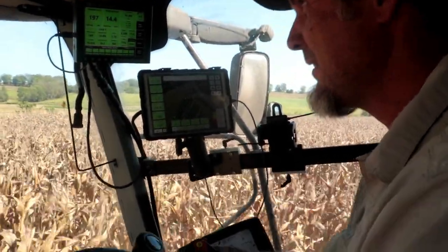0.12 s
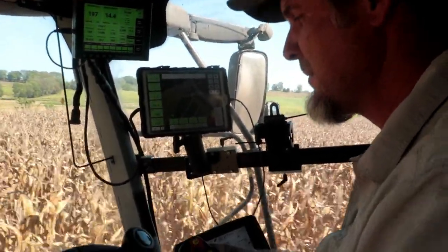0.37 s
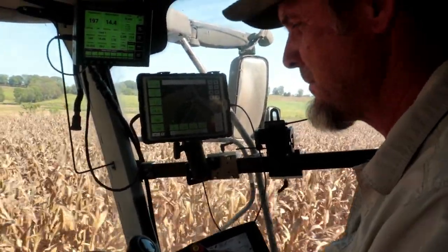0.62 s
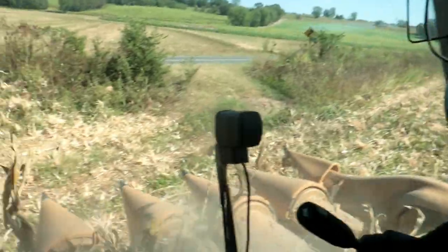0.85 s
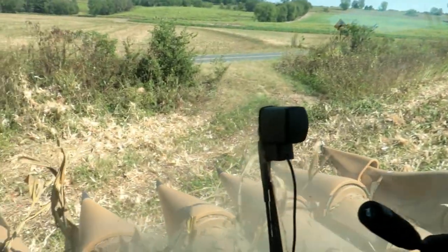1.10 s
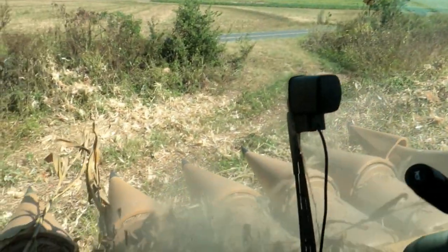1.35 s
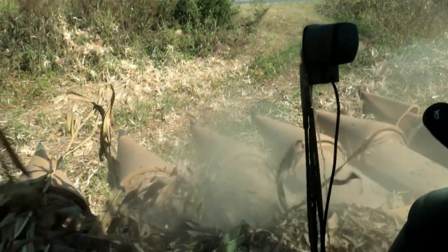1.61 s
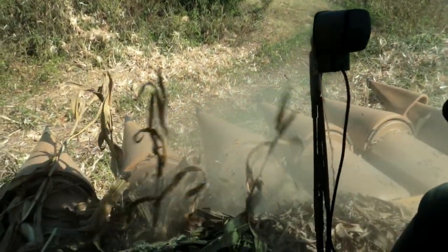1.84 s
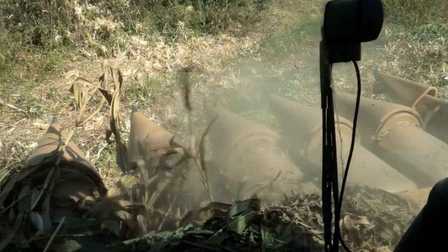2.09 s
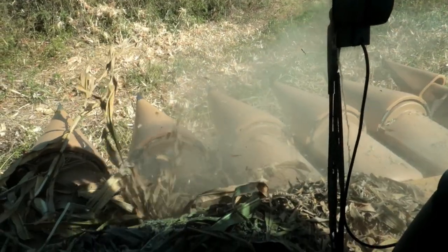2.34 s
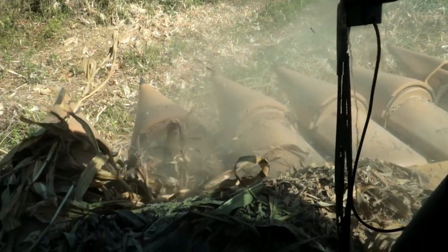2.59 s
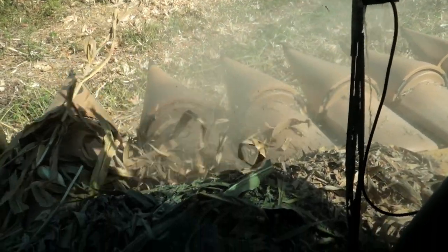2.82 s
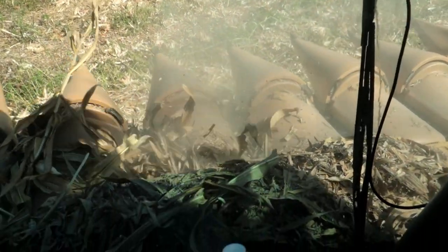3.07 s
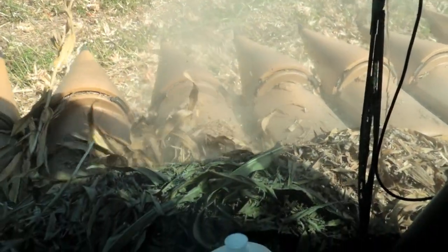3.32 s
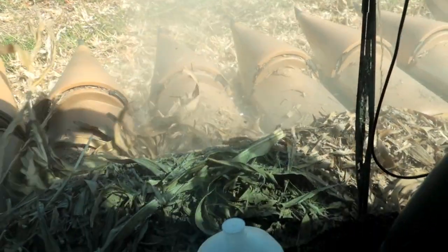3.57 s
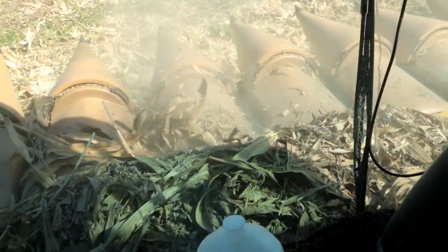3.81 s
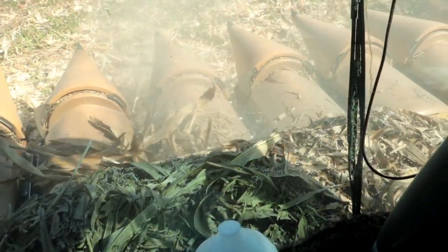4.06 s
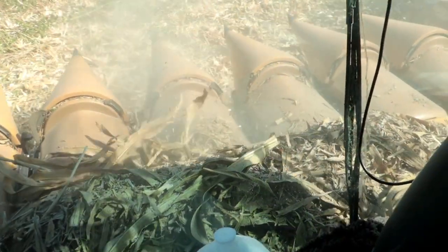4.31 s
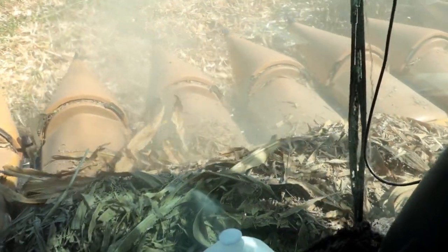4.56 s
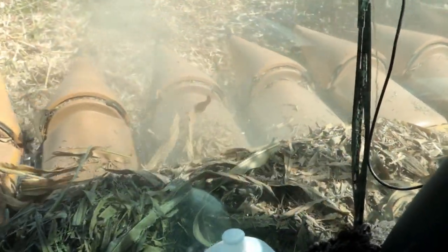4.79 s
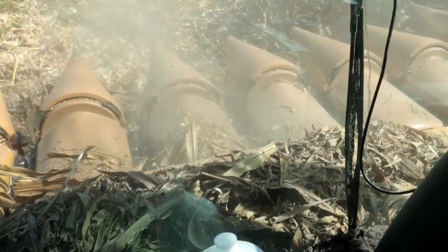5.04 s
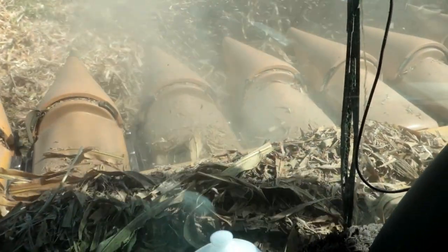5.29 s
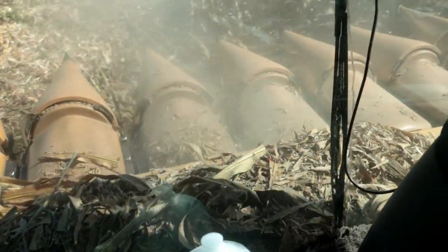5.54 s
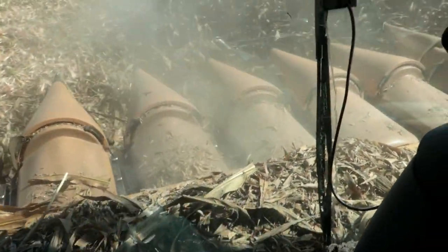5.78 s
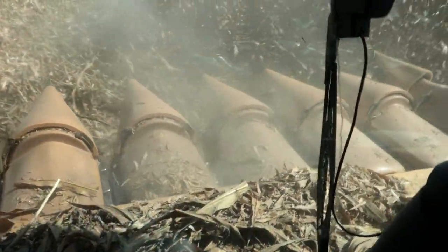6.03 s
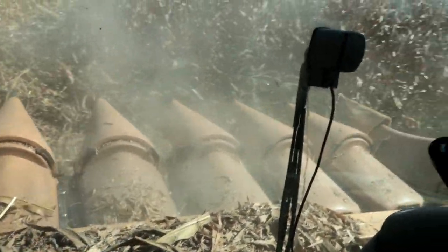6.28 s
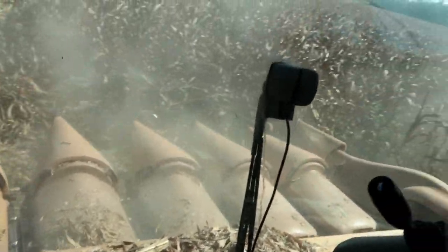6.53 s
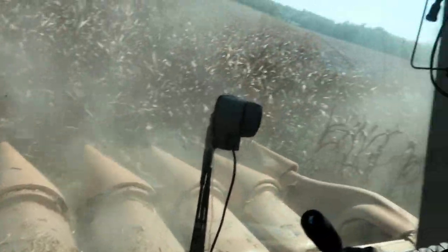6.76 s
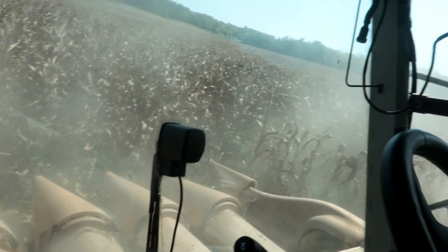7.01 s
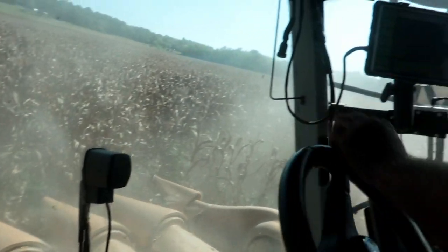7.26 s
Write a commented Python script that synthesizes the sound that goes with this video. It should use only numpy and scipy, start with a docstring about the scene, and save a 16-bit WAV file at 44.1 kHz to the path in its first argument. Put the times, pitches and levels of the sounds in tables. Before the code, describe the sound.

A combine works through dry corn, heard by a close stereo microphone in its enclosed cab. Bass dominates: engine throb, humming shafts and cab boom, pulsing unevenly. Chain clatter and soft chaff hiss sit far beneath. A hard cut comes early, the noise dips and then builds again, with dull knocks, loose rattles and faint fleeting gear whines over the continuous drone.

```python
"""Harvester cab at work

A six-cylinder diesel drones through the frame as crank orders; shafts hum as wavering sines. Cab boom, threshing
roar, chain clatter and chaff are coloured noise; crop knocks and trim ticks are decaying bursts; a joint squeaks
by stick-slip and a gear whines. A short first scene at the driver's side is cut to a second, later one.
A close pair of microphones (ports) hears the bass alike and the treble mostly in opposition."""
import sys
import numpy as np
from scipy import signal
from scipy.fft import rfft, irfft, next_fast_len
from scipy.io import wavfile
from scipy.ndimage import uniform_filter1d, map_coordinates

SR = 44100
rng = np.random.default_rng(int(sys.argv[2]) if len(sys.argv) > 2 else 0)


def to_wav(s):
    """Save 16-bit WAV."""
    ch = np.atleast_2d(s).T  # columns
    pcm = np.round(np.clip(ch, -1, 1) * 32767)  # PCM
    wavfile.write(sys.argv[1], SR, pcm.astype(np.int16))


def how_loud(loudness_db):
    """Turn decibels into a plain amplitude multiplier (0 dB gives 1, 20 dB gives 10)."""
    steps = np.asarray(loudness_db, float) / 20
    return 10 ** steps


N = 325458
T = np.arange(N) / SR
EDIT_S = 0.6723  # the second scene begins

# Engine, one list a scene; raised 1.5 dB in use: t/s, sixth order level/dB, twelfth order level/dB
ENGINE_LEVELS = [
    [(0.0, -19.5, -25.5), (0.28, -40.5, -56), (0.296, -23.5, -41), (0.61, -33.5, -40), (0.67, -15, -54)],
    [(0.68, -32, -38), (0.75, -29, -41), (0.94, -33, -38.5), (1.97, -28, -36), (2.92, -25.5, -27),
     (3.07, -17, -42), (3.31, -39, -30.5), (3.57, -48, -43), (3.67, -30, -33.5), (3.98, -37, -27.5),
     (4.04, -18.5, -27), (4.3, -27.5, -48), (4.41, -41, -28), (4.54, -21, -39), (4.88, -38, -27.5),
     (5.08, -25, -57), (5.2, -41, -27.5), (5.34, -23, -40), (5.57, -41, -31.5), (5.88, -22, -38),
     (6.3, -29.5, -26.5), (6.43, -35, -46), (6.59, -19, -34), (6.82, -27.5, -32), (7.25, -25.5, -35.5),
     (7.38, -19, -34)],
]
# Drone taken up by the cab air, one list a scene; raised 2 and 1 dB in use:
# t/s, firing order level/dB, hum under it level/dB
DRONE_LEVELS = [
    [(0.0, -29, -20), (0.136, -19, -15), (0.228, -26, -26), (0.254, -25, -17), (0.304, -12, -14.5),
     (0.358, -29, -18), (0.402, -42, -29), (0.448, -25, -20), (0.526, -18, -14), (0.564, -43, -19),
     (0.596, -20, -9), (0.642, -28, -15), (0.67, -19, -25)],
    [(0.68, -14, -15), (0.79, -35, -29), (0.83, -21, -41), (0.92, -20, -23), (1.2, -29, -28.5),
     (1.37, -13, -22), (1.43, -27, -20), (1.48, -30, -52), (1.56, -20, -14), (1.63, -12, -29),
     (1.78, -20.5, -24), (1.85, -12.5, -35), (1.91, -27, -18.5), (2.06, -13, -12), (2.1, -12, -33),
     (2.15, -38, -30), (2.21, -16, -34), (2.25, -15, -18), (2.34, -37, -24), (2.41, -11.5, -20),
     (2.47, -31, -33), (2.68, -20, -17), (2.97, -18, -19.5), (3.01, -34, -34), (3.09, -47, -19),
     (3.18, -18, -27.5), (3.4, -27, -16), (3.44, -28, -24), (3.52, -14.5, -20), (3.61, -40, -20.5),
     (3.7, -21, -16), (3.76, -16.5, -24), (3.98, -16.5, -20), (4.19, -29, -21), (4.28, -20, -36),
     (4.56, -17, -15), (4.69, -28, -33), (4.77, -16, -23), (4.82, -12.5, -41), (4.9, -25, -20),
     (4.93, -31, -26), (4.99, -11, -23), (5.05, -13.5, -22), (5.1, -12, -36), (5.34, -26.5, -20),
     (5.4, -23, -15), (5.49, -20.5, -29), (5.57, -19, -19), (5.66, -17.5, -25.5), (6.3, -22.5, -23),
     (6.35, -14.5, -22), (6.5, -22, -29), (6.54, -32, -14.5), (6.74, -14.5, -25), (6.78, -28, -30),
     (6.93, -14.5, -24), (7.15, -23.5, -26), (7.25, -11, -36), (7.3, -11, -29), (7.38, -29, -26)],
]
# Orders that follow the crop load, {order: (level at full load/dB, gain per dB of load/dB)}
LOAD_ORDERS = {1: (-24, 0.5), 21.5: (-47.5, 8), 27: (-42.5, 2.5)}
# Shaft hum, one list a scene; lowered 1.5 dB in use: t/s, level/dB
SHAFT_LEVELS = [
    [(0.0, -23), (0.642, -26), (0.67, -19)],
    [(0.68, -18), (0.81, -21.5), (3.87, -22), (4.02, -12), (4.08, -34), (4.17, -22), (4.43, -32),
     (4.47, -18), (4.67, -19), (4.71, -32), (5.21, -15.5), (5.64, -25), (6.11, -18), (6.17, -25),
     (7.34, -20), (7.38, -28)],
]
# Crop load, one list a scene: t/s, chain clatter level/dB, threshing roar level/dB, cab boom level/dB
WORK_LEVELS = [
    [(0, -35, -28.5, -21.5), (.67, -37.5, -32.5, -18)],
    [(.68, -40.5, -24.5, -13.5), (.74, -42.5, -36.5, -23), (.8, -42, -30, -25.5), (.9, -41.5, -32, -21),
     (.99, -39, -27, -21), (1.1, -39.5, -30.5, -20.5), (1.3, -38, -25.5, -18.5), (1.4, -38, -26.5, -17),
     (1.6, -36, -24.5, -18.5), (2.15, -36.5, -25, -17), (2.4, -36.5, -25, -18), (3.2, -37, -24.5, -16),
     (3.45, -38.5, -26.5, -18), (4, -36, -23.5, -18.5), (4.2, -36.5, -24.5, -16),
     (4.8, -36.5, -24.5, -17.5), (5.1, -35, -23, -16.5), (5.3, -36.5, -25, -18.5), (5.9, -36.5, -24, -17.5),
     (6.03, -38.5, -27, -18.5), (6.58, -36, -25.5, -17), (7.15, -36, -24.5, -16), (7.3, -36.5, -25.5, -16),
     (7.38, -39, -28, -23)],
]
# Colour of frame and cab air: f/Hz, relative density/dB per Hz
BOOM_COLOUR = [(10, -34.5), (17, -19.5), (24, -4), (45, -1.5), (57, -13.5), (66, -2.5), (72, -8.5),
               (100, -3.5), (118, -4), (130, -5), (141, -7), (155, -4), (178, -12), (215, -6), (240, -11.5),
               (300, -18), (390, -47), (660, -120)]
# Colour of threshing: f/Hz, relative density/dB per Hz
ROAR_COLOUR = [(130, -32), (220, -3.5), (351, -6), (388, -5.5), (432, -7), (610, -8.5), (660, -14.5),
               (800, -13), (920, -22), (998, -27), (1200, -20.5), (1560, -57.5), (2640, -120)]
# Ringing sheet metal: f/Hz, width/Hz, level over the roar colour/dB
PANELS = [(324.7, 11, -3), (687, 37, -2.5), (876, 29, 6.5)]
# Colour of the chain: f/Hz, relative density/dB per Hz
CLATTER_COLOUR = [(530, -30.5), (900, -1), (939, -1.5), (1000, -5), (1090, -4.5), (1360, -12.5),
                  (1630, -9.5), (2340, -2.5), (3200, -19.5), (4160, -50), (7040, -120)]
# Colour of chaff: f/Hz, relative density/dB per Hz
CHAFF_COLOUR = [(2000, -26.5), (3000, -3), (4000, -5), (5000, -10.5), (5600, -9), (6200, -14.5),
                (7700, -19.5), (8600, -24), (9500, -26.5), (14000, -29), (16500, -60)]
# Slat resonance in the feeder, one list a scene: t/s, level/dB
SLAT_LEVELS = [
    [(0, -47), (.67, -45.5)],
    [(.68, -47), (1.0, -46.5), (1.4, -44.5), (2, -49), (3, -46), (4, -49.5), (5, -49.5), (5.8, -46.5),
     (6.3, -45.5), (6.7, -46), (7.0, -46), (7.38, -46)],
]
# Colour of what differs between the ports: f/Hz, relative density/dB per Hz
WIDE_COLOUR = [(15, -30.5), (45, 6.5), (70, -0.5), (100, -0.5), (178, 2), (325, 5.5), (476, 1), (697, -7),
               (1350, -1.5), (1680, -8.5), (2270, 1), (3000, -10.5), (4000, -15), (5000, -27),
               (7000, -40.5), (9000, -84)]
# Lean of the machinery to the left: f/Hz, share of the sound/1
LEFT_SHARE = [(500, 0), (900, .05), (1400, .17), (2200, .1), (3500, .06), (6000, 0.0027)]
# Colour of the hiss in opposition: f/Hz, relative density/dB per Hz
HISS_COLOUR = [(2500, -32.5), (3500, -9.5), (5500, -1.5), (6000, -8), (6500, -5), (7200, -8), (10000, -9.5),
               (13000, -11), (14500, -15), (15100, -24), (15700, -25), (16500, -58.5)]
# Colour at the driver's side of the cab: f/Hz, gain/dB
FIRST_COLOUR = [(130, 4), (230, -2), (330, 3.5), (500, 1), (870, -1.5), (1000, -4), (1600, 1), (2300, 2),
                (2900, 5.5), (3800, 4.5), (5000, 1), (8500, -1.5), (12000, -12)]
# Crop knocking in the header: t/s, level/dB, centre f/Hz, width/Hz
KNOCKS = [(1.043, -32, 1356, 300), (1.155, -58, 2130, 400), (1.306, -34, 2400, 2400),
          (1.316, -22, 1370, 200), (1.345, -35, 1440, 250), (1.35, -32.5, 2500, 304),
          (1.45, -36, 2600, 2600), (1.565, -20, 720, 300), (1.785, -22.5, 750, 400),
          (2.151, -23, 1150, 800), (2.154, -27.5, 2200, 1800), (2.139, -24, 834, 250),
          (2.155, -33, 3000, 250), (2.177, -45, 4050, 250), (2.232, -23, 1100, 1190),
          (2.233, -40, 3870, 2000), (2.236, -21, 690, 250), (2.236, -31.5, 2200, 1400),
          (2.545, -29, 2170, 500), (2.512, -26, 750, 400), (2.604, -29, 1300, 700), (2.64, -21.5, 744, 400),
          (2.92, -26, 800, 500), (3.444, -26, 1095, 148), (4.004, -30.5, 1240, 700),
          (4.456, -28.5, 1300, 700), (4.544, -34, 1300, 700), (4.555, -22, 750, 402),
          (5.11, -30, 1300, 700), (5.28, -20.5, 740, 400), (5.785, -22, 795, 500), (6.655, -31, 1402, 902),
          (6.65, -34, 2600, 1500), (6.737, -28, 1390, 300), (7.008, -28, 1340, 605),
          (7.088, -35, 1960, 252), (7.042, -38, 3300, 1300), (7.044, -28, 2080, 550)]
# Ticks and rustles of trim near the left port: t/s, level/dB, centre f/Hz, width/Hz, t60/s
TICKS = [(1.172, -41, 7940, 5000, 0.013), (1.31, -51, 6360, 5060, 0.086), (1.375, -55, 8050, 4000, 0.019),
         (2.23, -52.5, 5550, 3900, 0.13), (2.925, -50.5, 5500, 5000, 0.16),
         (4.251, -47.5, 6000, 2500, 0.022), (4.49, -57.5, 7940, 6000, .092),
         (5.0, -49.5, 8000, 3000, 0.023), (6.279, -54.5, 10800, 900, 0.1), (6.288, -52.5, 13140, 1300, 0.1),
         (6.578, -61.5, 10000, 7300, 0.19)]
# Squeaks: t/s, level/dB, starting rate of slips f/Hz
SQUEAKS = [(1.029, -49.5, 634), (1.563, -46, 722), (2.093, -40, 737)]
# Colour of the joint: f/Hz, relative level/dB
JOINT_COLOUR = [(600, -41.5), (1400, -6), (2500, -7.5), (3500, -2), (4300, -5), (5100, -12), (6000, -19),
                (7000, -32)]
# Glints of a gear whine: peak t/s, f/Hz, level/dB, slide/Hz per s
GLINTS = [(2.22, 2300, -41, -600), (2.55, 2200, -40, 0), (3.895, 2330, -39.5, 1499),
          (3.96, 2200, -36, -400), (4.0, 2205, -36, 897), (4.15, 2300, -41, 1), (4.365, 2320, -33, 600),
          (4.45, 2290, -32.5, 598), (4.53, 2256, -37, 0), (4.62, 2290, -41, -3), (4.89, 2195, -40, 5),
          (4.978, 2420, -37, 0), (5.08, 2400, -36.5, 300), (5.2, 2390, -43, -1), (5.85, 2220, -35, 0),
          (6.43, 2260, -39, 0), (6.471, 2370, -38.5, 0), (6.53, 2120, -37.5, 1), (6.88, 2340, -38, 0)]

CRANK_HZ, SHAFT_HZ, IDLER_HZ, UNDER_HZ = 32.45, 40, 35.2, 86.5
CHAIN_HZ = 10.8  # slats passing a second
IDLER_DB, SECOND_DB, SECOND_FIRST_DB = -29.5, -35.5, 8.5
FULL_LOAD_DB = -25  # roar at full load
THROB_DB = 3.5  # high orders, at the rate of the chain
TWIST_RAD, FIRING_STRAY_RAD = 0.11, 1.2  # per order and unit of random curve; drone
WAVER_DB, WAVERS_PER_S = 1, 9.1
CHAFF_DB, CHAFF_FIRST_DB = -14, 3  # under the clatter; more at the driver's side
SLAT_HZ, SLAT_WIDTH_HZ = 1366, 130
KNOCK_T60_S, KNOCK_LEFT_DB, TICK_LEFT_DB = 0.1, 2.5, 11  # left over right
RING_Q = 2.5  # pitch over width from which a knock starts to ring
RATTLE_COUNT, RATTLE_DB, RATTLE_SPREAD_DB = 90, -48, 4
RATTLE_HZ, RATTLE_OCTAVES, RATTLE_T60_S = 1520, 0.29, 0.045
LOW_RATTLE_COUNT, LOW_RATTLE_DB, LOW_RATTLE_SPREAD_DB, LOW_RATTLE_T60_S = 70, -34, 5, 0.13
SQUEAK_S, SAG_HZ_PER_S, STUTTER_DB = 0.038, 1700, 2.5
GLINT_DB_PER_S, GLINT_HOLD_S = 452, 0.015
WHINE_HZ, WHINE_DB = 8001, -75


def unit(x):
    """Scale to rms 1."""
    return x / np.sqrt(np.mean(x ** 2) + 1e-20)


def along(points, hz):
    """(Hz, value) points read on a log axis."""
    f, v = np.transpose(points)
    return np.interp(np.log(hz + 1), np.log(f + 1), v)


def curves(scenes):
    """One value per sample for each column after the time, scene after scene."""
    s, *cols = np.transpose(np.vstack(scenes))
    return [np.interp(T, s, c) for c in cols]


def wobble(rate):
    """A smooth random curve, rate knots a second."""
    return map_coordinates(rng.standard_normal(int(N * rate / SR) + 4), [T * rate])


def filtered(x, response):
    """x times a response of frequency."""
    m = next_fast_len(x.shape[-1] + 8192)
    return irfft(rfft(x, m) * response(np.fft.rfftfreq(m, 1 / SR)), m)[..., :x.shape[-1]]


def smooth_patches(shape, bins, frames):
    """Random field of rms 1, smoothed over frequency bins and time frames."""
    field = uniform_filter1d(rng.standard_normal(shape), size=bins, axis=0)
    return unit(uniform_filter1d(field, size=frames, axis=1))


def rush(colour, patchy_db, ringing_db=0):
    """Coloured noise of rms 1 with broad patches of random gain and narrow ones, where loose parts ring briefly."""
    z = signal.stft(rng.standard_normal(N), nperseg=1024, noverlap=768)[2]
    broad = smooth_patches(z.shape, bins=12, frames=10)
    narrow = smooth_patches(z.shape, bins=2, frames=12)
    patched = z * how_loud(patchy_db * broad + ringing_db * narrow)
    noise = signal.istft(patched, nperseg=1024, noverlap=768)[1][:N]
    return unit(filtered(noise, colour))


def turns(hz, drift):
    """Phase of a rotating part whose speed strays a little."""
    return 2 * np.pi * np.cumsum(hz * (1 + drift * wobble(9))) / SR


def hum(phase, db):
    """A sine whose level wavers slowly and trembles fast."""
    waver_db = WAVER_DB * wobble(WAVERS_PER_S)
    tremble_db = 2.0 * wobble(28)
    return how_loud(db + waver_db + tremble_db) * np.sin(phase)


def drone(crank):
    """Firing order, three a turn, swelling in the cab air and beating with a frame hum just under it."""
    firing_db, under_db = curves(DRONE_LEVELS)
    firing_phase = 3 * crank + FIRING_STRAY_RAD * wobble(9)
    firing = how_loud(firing_db + 2.0 + 1.2 * wobble(28)) * np.sin(firing_phase)
    under = how_loud(under_db + 1.0 + 1.1 * wobble(28)) * np.sin(turns(UNDER_HZ, drift=0.02))
    return firing + under


def engine():
    """Crank orders share one straying speed; most also twist, and the firing order strays on its own."""
    load_db = curves(WORK_LEVELS)[1] - FULL_LOAD_DB
    crank = turns(CRANK_HZ, drift=0.004)
    twist = TWIST_RAD * (wobble(7) + wobble(25))
    beat = np.cos(turns(CHAIN_HZ, drift=0.12))  # the chain shakes the frame
    out = drone(crank)
    for order, (db, share) in LOAD_ORDERS.items():
        throb_db = THROB_DB * beat * (order > 3)
        out = out + hum(order * (crank + 0.3 * twist), db + share * load_db + throb_db)
    first = np.clip((EDIT_S - T) * CRANK_HZ, 0, 1)  # fades over the last turn
    out = out + hum(2 * crank, SECOND_DB + SECOND_FIRST_DB * first)
    for order, db in zip((6, 12), curves(ENGINE_LEVELS)):
        out = out + how_loud(db + 1.5 + 0.74 * wobble(22)) * np.sin(order * (crank + twist))
    return out


def shafts():
    """A shaft and a slower idler, each turning at its own straying speed."""
    shaft = hum(turns(SHAFT_HZ, drift=0.015), curves(SHAFT_LEVELS)[0] - 1.5)
    return shaft + hum(turns(IDLER_HZ, drift=0.01), IDLER_DB)


def boom(db):
    """Low noise of frame and cab air."""
    return how_loud(db + 0.45 * wobble(12)) * rush(lambda hz: how_loud(along(BOOM_COLOUR, hz)), patchy_db=0.62)


def panel_gain(hz):
    """Sheet-metal resonances standing on a flat response."""
    return 1 + sum(how_loud(db) * w * w / (w * w + 4 * (hz - c) ** 2) for c, w, db in PANELS)


def roar(db, slat, flutter):
    """Threshing noise ringing the sheet metal, beaten by the slats."""
    level = how_loud(db + 0.22 * wobble(5.2) + 1.0 * slat + 0.36 * flutter)
    return level * rush(lambda hz: how_loud(along(ROAR_COLOUR, hz)) * panel_gain(hz), patchy_db=0.35, ringing_db=1.5)


def clatter(db, slat, flutter):
    """Chain noise with briefly ringing parts, beaten by the slats."""
    level = how_loud(db + 0.7 * slat + 0.16 * flutter)
    return level * rush(lambda hz: how_loud(along(CLATTER_COLOUR, hz)), patchy_db=0.2, ringing_db=2.0)


def slat_resonance(chain):
    """Clatter through one feeder resonance that comes and goes with the crop."""
    def resonance(hz):
        return SLAT_WIDTH_HZ ** 2 / (SLAT_WIDTH_HZ ** 2 + 4 * (hz - SLAT_HZ) ** 2)
    return how_loud(curves(SLAT_LEVELS)[0] + 1.8 * wobble(14)) * unit(filtered(chain, resonance))


def chaff(db, flutter):
    """Patchy treble noise."""
    return how_loud(db + 0.12 * flutter) * rush(lambda hz: how_loud(along(CHAFF_COLOUR, hz)), patchy_db=0.75, ringing_db=2.5)


def port_difference(mid, clatter_db, flutter):
    """Noise in opposition, plus a lean to the left: the nearer port gets more of the header."""
    own = how_loud(clatter_db - 5.0 + 0.6 * flutter) * rush(lambda hz: how_loud(along(WIDE_COLOUR, hz)), patchy_db=4.0)
    return own + filtered(mid, lambda hz: np.clip(along(LEFT_SHARE, hz), 0, 0.9))


def hiss(chaff_db, flutter):
    """Treble noise that follows the chaff level in part."""
    level = how_loud(0.73 * chaff_db - 18.5 + 0.6 * flutter)
    return level * rush(lambda hz: how_loud(along(HISS_COLOUR, hz)), patchy_db=2.5, ringing_db=3.5)


def machinery():
    """Noise sources at both ports, sharing the slat beat and a flutter; the first scene is coloured."""
    clatter_db, roar_db, boom_db = curves(WORK_LEVELS)
    chaff_db = clatter_db + CHAFF_DB + CHAFF_FIRST_DB * (T < EDIT_S)
    slat = np.cos(turns(CHAIN_HZ, drift=0.11))
    flutter = wobble(23)
    chain = clatter(clatter_db, slat, flutter)
    mid = boom(boom_db) + roar(roar_db, slat, flutter) + chain + slat_resonance(chain) + chaff(chaff_db, flutter)
    side = port_difference(mid, clatter_db, flutter)
    pair = np.array([mid + side, mid - side])
    first = filtered(pair, lambda hz: how_loud(along(FIRST_COLOUR, hz)))
    later = np.clip((T - EDIT_S) / 0.003 + 0.5, 0, 1)
    return (1 - later) * first + later * pair + hiss(chaff_db, flutter) * [[1], [-1]]


def rattles():
    """Small knocks at random moments, as rows for knocks()."""
    rows = []
    for s, (size, pitch) in zip(rng.random(RATTLE_COUNT) * T[-1], rng.standard_normal((RATTLE_COUNT, 2))):
        hz = RATTLE_HZ * np.exp2(RATTLE_OCTAVES * pitch)
        db = RATTLE_DB + RATTLE_SPREAD_DB * size
        rows.append((s, db, hz, 0.35 * hz, RATTLE_T60_S, KNOCK_LEFT_DB))
    return rows


def low_rattles():
    """Random low rattles ringing near two sheet-metal resonances, as rows for knocks()."""
    rows = []
    draws = zip(rng.random((LOW_RATTLE_COUNT, 2)), rng.standard_normal((LOW_RATTLE_COUNT, 2)))
    for (when, which), (size, pitch) in draws:
        hz = PANELS[1 + int(2 * which)][0] * (1 + 0.02 * pitch)
        db = LOW_RATTLE_DB + LOW_RATTLE_SPREAD_DB * size
        rows.append((when * T[-1], db, hz, 0.16 * hz, LOW_RATTLE_T60_S, KNOCK_LEFT_DB / 2))
    return rows


def knocks():
    """Short bursts of noise, each in one resonance, dying fast; narrow resonances sound as tones."""
    out, t = np.zeros((2, N + SR)), np.arange(SR // 8) / SR
    rows = [(*row, KNOCK_T60_S, KNOCK_LEFT_DB) for row in KNOCKS]
    rows += [(*row, TICK_LEFT_DB) for row in TICKS]
    for s, db, hz, width_hz, t60_s, left_db in rows + rattles() + low_rattles():
        band = lambda f: 1 / (1 + (2 * (f - hz) / width_hz) ** 4)
        noise = unit(filtered(rng.standard_normal(len(t)), band))
        tone = np.sqrt(2) * np.sin(2 * np.pi * hz * t)
        ring = np.clip(1 - RING_Q * width_hz / hz, 0, 1) * (left_db < TICK_LEFT_DB)  # trim never rings
        attack = 1 - np.exp(-t / (0.028 * t60_s))
        burst = ((1 - ring) * noise + ring * tone) * how_loud(db - 60 * t / t60_s) * attack
        sign = 1 if hz < 5500 else -1  # treble reaches the ports in opposition
        out[:, round(s * SR):][:, :len(t)] += burst * [[how_loud(left_db / 2)], [sign * how_loud(-left_db / 2)]]
    return out[:, :N]


def squeaks():
    """Stick-slip at a falling rate: partials through the joint's colour, each breaking up on its own."""
    out = np.zeros(N)
    k = np.arange(1, 12)[:, None]
    u = np.arange(int(SQUEAK_S * SR)) / (SQUEAK_S * SR)
    for s, db, slip_hz in SQUEAKS:
        jitter = unit(uniform_filter1d(rng.standard_normal(len(u)), size=80))
        hz = (slip_hz - SAG_HZ_PER_S * SQUEAK_S * u) * (1 + 0.0098 * jitter)
        stutter = unit(uniform_filter1d(rng.standard_normal((len(k), len(u))), size=300))
        phase = 2 * np.pi * (k * np.cumsum(hz) / SR + rng.random(k.shape))
        partials = how_loud(along(JOINT_COLOUR, k * hz) + STUTTER_DB * stutter) * np.sin(phase)
        swell = np.sin(np.pi * u) ** 0.45
        out[round(s * SR):][:len(u)] += how_loud(db) * unit(partials.sum(0)) * swell
    return out * how_loud(np.array([[4], [-4]]))  # left, right


def gear():
    """Brief swells of a thin, sliding, slightly unsteady whine."""
    out, u = np.zeros(N), np.arange(-(SR // 8), SR // 8) / SR
    stray = turns(1, drift=0.003) - 2 * np.pi * T  # rad per Hz
    for s, hz, db, slide in GLINTS:
        start = round(s * SR) - SR // 8
        at = slice(start, start + len(u))
        away_s = np.maximum(np.abs(u) - GLINT_HOLD_S / 2, 0)
        phase = 2 * np.pi * (hz * u + slide * u * u / 2) + hz * stray[at]
        out[at] += how_loud(db - GLINT_DB_PER_S * away_s) * np.sin(phase)
    return out


def edit():
    """The wave jumps at the join: a step that grows and drains within milliseconds."""
    t = T - EDIT_S
    return 0.12 * np.sign(t) * np.exp(-np.abs(t) / 0.002)


def whine():
    """Steady sine of electronics near the left port, weaker and inverted at the right."""
    return how_loud(WHINE_DB) * np.sin(2 * np.pi * WHINE_HZ * T) * np.array([[1], [-0.4]])


def scene():
    """All sources, left and right."""
    return engine() + shafts() + machinery() + knocks() + squeaks() + gear() + edit() + whine()


def roll_off(x):
    """The treble ends steeply here."""
    return signal.sosfilt(signal.butter(12, 15750, fs=SR, output="sos"), x)


def record(dry):
    """A few milliseconds of fade at both ends, then a soft ceiling on the peaks."""
    faded = dry * np.clip(np.minimum(T, T[-1] - T) / 0.004, 0, 1)
    ceiling = 0.8
    mix = faded / (1 + np.abs(faded / ceiling) ** 6) ** (1 / 6)
    return roll_off(mix)


dry = scene()
out = record(dry)
to_wav(out)
```